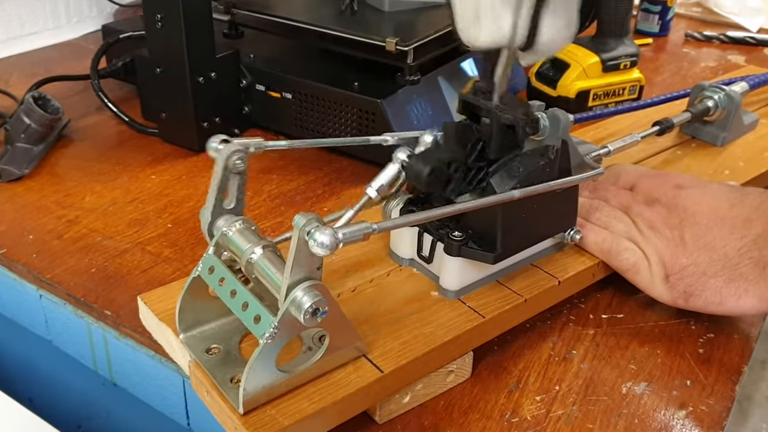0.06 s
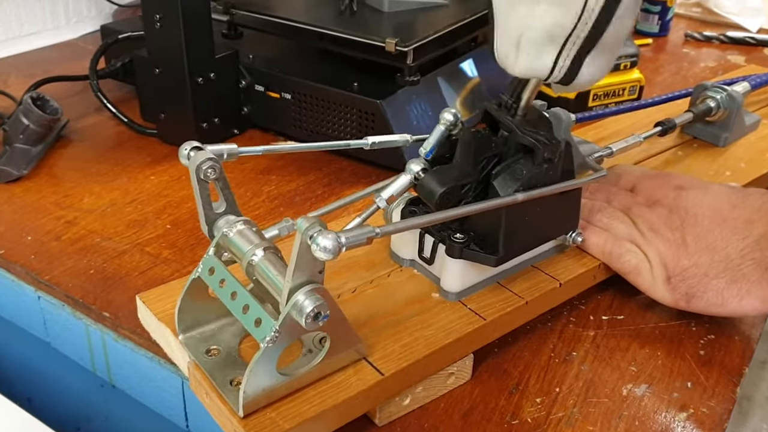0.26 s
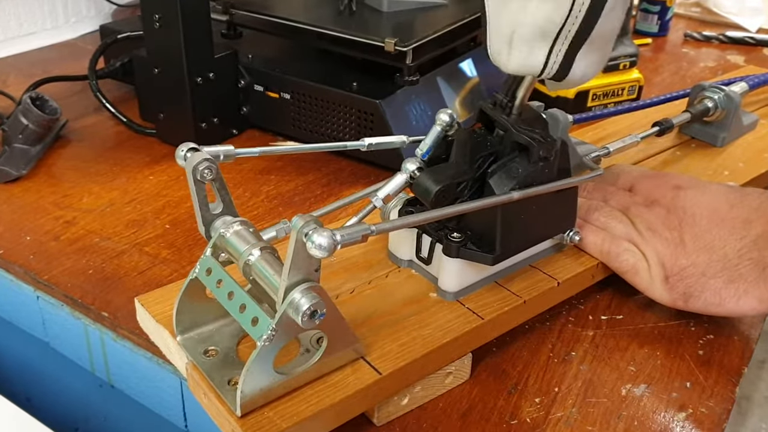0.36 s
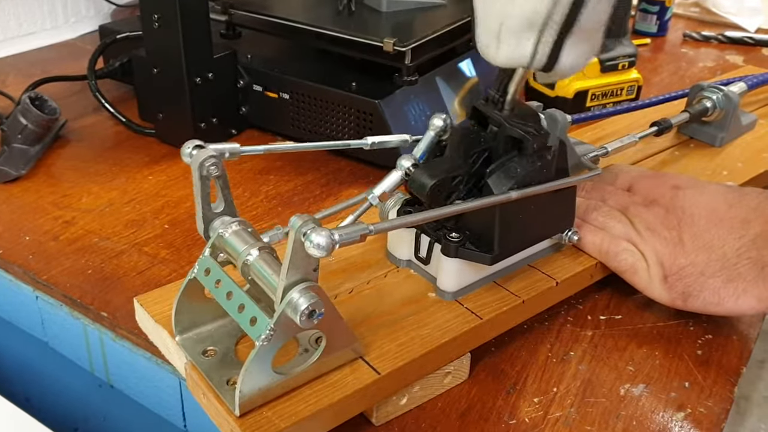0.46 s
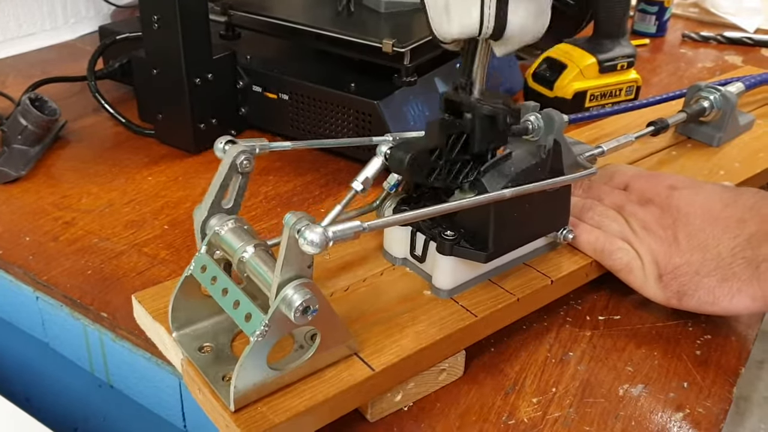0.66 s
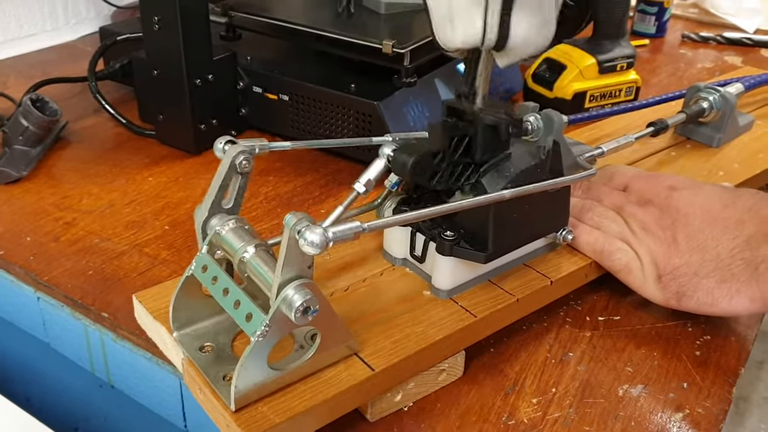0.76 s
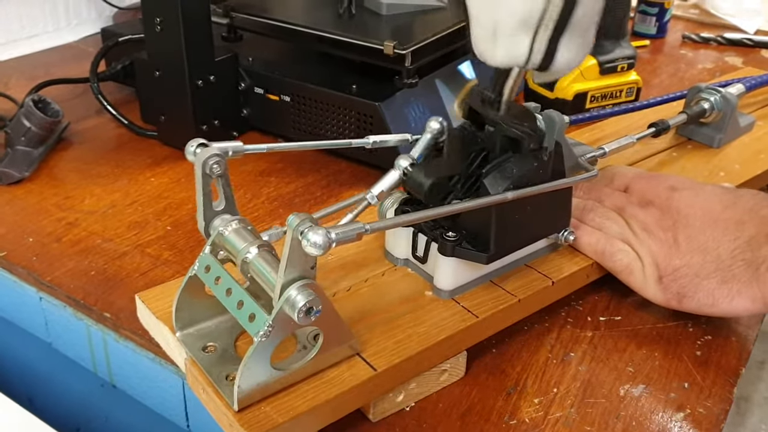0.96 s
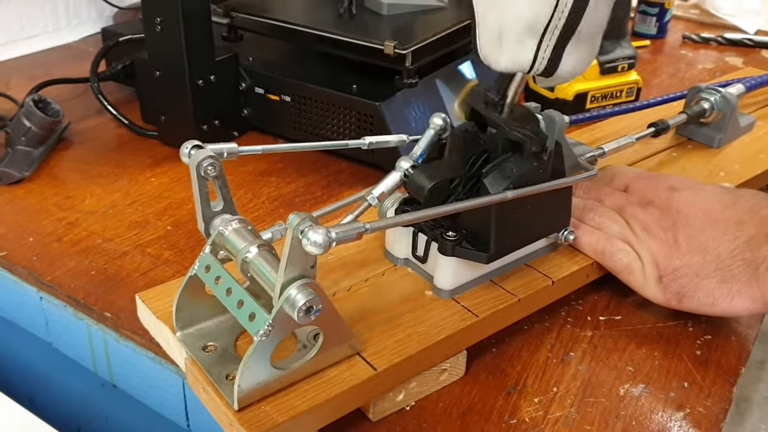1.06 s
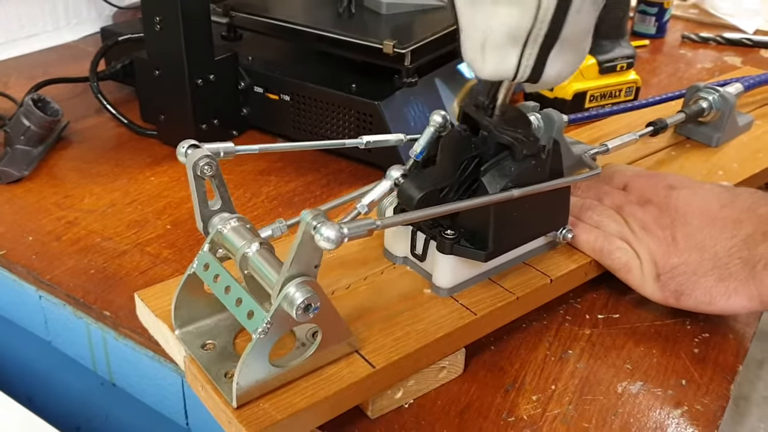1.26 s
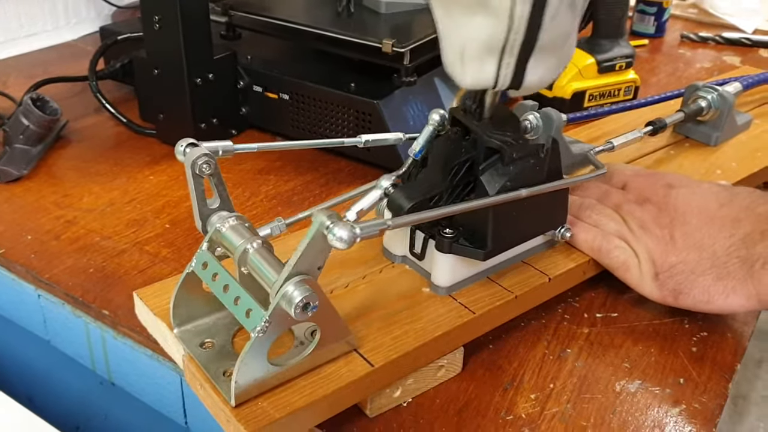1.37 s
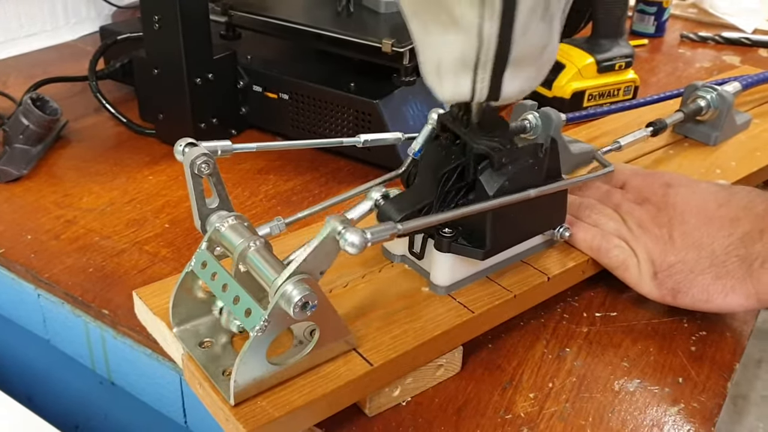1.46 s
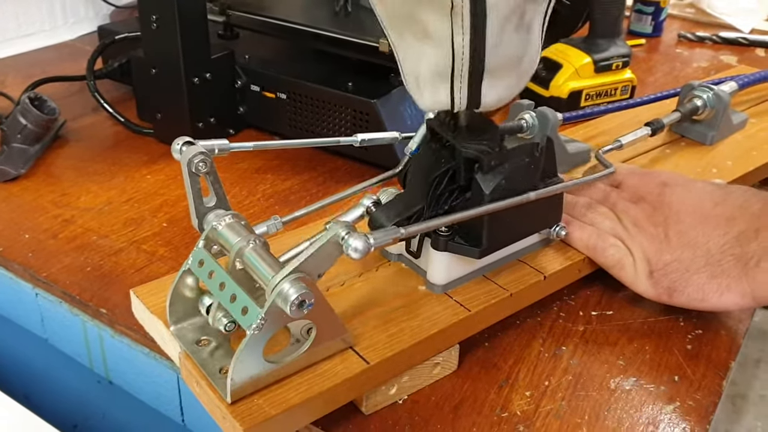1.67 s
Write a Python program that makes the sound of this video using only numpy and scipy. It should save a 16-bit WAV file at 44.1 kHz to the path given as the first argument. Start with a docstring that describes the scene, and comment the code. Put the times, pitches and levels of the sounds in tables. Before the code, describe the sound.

One sharp metal clack from a gear shifter, then light clicks and a brief squeak.

```python
"""A gear lever on a workbench

A gloved hand works a gear lever and its rods on a wooden bench in a small workshop. The lever snaps
into its gate with one hard clack that sets the metal ringing. Loose ball joints click, pivots rub and
groan, a rod whistles, and a dry joint lets go with a sharp squeak. The bench rumbles faintly below."""
import sys
import numpy as np
from scipy import signal
from scipy.fft import rfft, irfft
from scipy.io import wavfile
from scipy.ndimage import uniform_filter1d

SR = 44100
rng = np.random.default_rng(int(sys.argv[2]) if len(sys.argv) > 2 else 0)


def master(y):
    """Save y as 16-bit WAV."""
    cut = np.clip(np.atleast_2d(y).T, -1, 1)
    pcm = np.round(cut * 32767)  # scale
    wavfile.write(sys.argv[1], SR, pcm.astype(np.int16))


N = 74970  # 1.7 seconds


def amp(db):
    """Turns decibels into a number to multiply by."""
    return 10 ** (np.asarray(db) / 20)


def unit(x):
    """Scales a signal to an average (rms) size of 1."""
    return x / np.sqrt(np.mean(x ** 2) + 1e-20)


def unit_energy(x):
    """Scales a signal to an energy of 1 per channel."""
    return unit(x) / np.sqrt(x.shape[-1])


def read(points, hz):
    """Looks up a value between the rows of a frequency table."""
    freqs, values = np.transpose(points)
    return np.interp(np.log(hz + 1), np.log(freqs + 1), values)


def level(table, column):
    """Turns one dB column of a timed table into a volume curve."""
    columns = np.transpose(table)
    return amp(np.interp(np.arange(N) / SR, columns[0], columns[column]))


def pan(db):
    """Left and right gains; positive dB leans left."""
    return amp(np.array([[db], [-db]]) / 2)


def add(mix, start, sound):
    """Mixes a stereo sound in at a start time in seconds."""
    part = mix[:, max(round(start * SR), 0):][:, :sound.shape[-1]]
    part += sound[:, :part.shape[-1]]


def colour(x, points, size=4096):
    """Makes each frequency louder or softer, following rows of Hz and dB."""
    log_gain = np.log(amp(read(points, abs(np.fft.fftfreq(size, 1 / SR)))))
    response = np.exp(np.conj(signal.hilbert(log_gain)))  # nothing sounds ahead of a hit
    taps = np.fft.ifft(response).real[:size // 2]
    return signal.fftconvolve(x, taps[None], axes=1)[:, :x.shape[-1]]


def wander(size, smooth):
    """A random drift, averaged over `smooth` samples."""
    return unit(uniform_filter1d(rng.standard_normal(N), smooth))[:size]


def burst(t, rise, fade):
    """Rises quickly, then dies away. A fade time is how long a drop of 60 dB takes."""
    return np.minimum(t / rise, 1) * amp(-60 * t / fade)


# How alike left and right sound. Each row: frequency in Hz, likeness (1 means the same).
LIKENESS = [(100, 0.94), (300, 0.94), (900, 0.57), (2000, 0.14), (8000, 0.12)]

def noise(size):
    """Stereo white noise: the sides are alike in the bass and nearly unrelated in the treble."""
    mid, side = np.exp(2j * np.pi * rng.random((2, size // 2 + 1)))
    same = np.clip(read(LIKENESS, np.fft.rfftfreq(size, 1 / SR)), -1, 1)
    mid, side = mid * np.sqrt(1 + same), side * np.sqrt(1 - same)
    return unit(irfft(np.array([mid + side, mid - side]), size))


def tone(t, hz, db, rise, fade):
    """One dying tone; the higher it is, the more left and right are out of step."""
    apart = (1 - read(LIKENESS, hz)) * np.array([[1], [-1]]) * np.pi / 4
    return amp(db) * burst(t, rise, fade) * np.sin(2 * np.pi * hz * t + apart)


# The workshop's echo. Each row: frequency in Hz, fade time in seconds.
ROOM_FADE = [(150, 0.43), (500, 0.52), (1200, 0.29), (3500, 0.29), (8000, 0.24), (15000, 0.23)]

def in_room(x, echo_db):
    """Adds the short, dense echo of the workshop, 5 milliseconds late."""
    hz, t, spectrum = signal.stft(noise(SR // 2), SR, nperseg=256)
    fading = amp(-60 * t / read(ROOM_FADE, hz)[:, None])
    tail = signal.istft(spectrum * fading, SR, nperseg=256)[1]
    out = x.copy()
    add(out, 0.005, amp(echo_db) * signal.fftconvolve(x, unit_energy(tail), axes=1))
    return out


# The tone of the still air and of the rumble. Each row: frequency in Hz, boost in dB.
AIR_COLOUR = [(30, 3.5), (200, -9), (450, -19.5), (800, 14.5), (2000, 0.5), (7000, 8), (16000, -30.5)]
RUMBLE_COLOUR = [(15, -13.5), (35, -7.5), (68, 6.5), (95, -5.5), (130, -3.5), (220, -16), (400, -25),
                 (1500, -64.5)]
# The bench's shudder. Each row: time in seconds, sway level in dB, rumble level in dB.
BENCH_LEVELS = [(0, -71, -61.5), (.2, -85, -57.5), (.33, -89, -53.5), (.48, -70, -61.5), (.62, -87, -57.5),
                (.78, -62, -59), (1.0, -56.5, -55.5), (1.15, -56, -60), (1.35, -56, -64.5),
                (1.5, -75.5, -65), (1.7, -70.5, -58.5)]

def bench(sway_hz=45):
    """The bench sways and rumbles under the hand, over the quiet air of the room."""
    pitch = sway_hz * (1 + 0.044 * wander(N, smooth=4000))
    sway = unit(np.sin(2 * np.pi * np.cumsum(pitch) / SR)) * level(BENCH_LEVELS, 1)
    rumble = unit(colour(noise(N), RUMBLE_COLOUR)) * level(BENCH_LEVELS, 2)
    air = amp(-71.5) * unit(colour(noise(N), AIR_COLOUR))
    return sway + rumble + air


# The tone of the scrape and of the hiss. Each row: frequency in Hz, boost in dB.
SCRAPE_COLOUR = [(80, 1), (200, -3.5), (430, -16), (800, -2), (1400, 0), (2400, -3.5), (4000, -16),
                 (9000, -34)]
HISS_COLOUR = [(1000, -24), (1500, -8), (2100, -11), (3000, -4), (4500, -5.5), (5500, -3), (7000, -5),
               (8700, -11.5), (12000, -10), (16000, -25)]
# The sliding parts. Each row: time in seconds, scrape level in dB, hiss level in dB.
RUB_LEVELS = [(0, -62.5, -61.5), (.09, -52.5, -61.5), (.15, -67.5, -69.5), (.39, -67.5, -66),
              (.47, -63.5, -66), (.53, -60, -61), (.57, -51, -61), (.62, -59.5, -70), (.68, -70, -68.5),
              (.76, -69, -71.5), (.82, -57, -60), (.885, -55, -60), (.94, -68, -68.5), (1.01, -59.5, -65),
              (1.09, -72, -69), (1.36, -61, -60.5), (1.48, -69, -62.5), (1.65, -79.5, -75.5)]

def rubbing(catches_per_second=690, catch_share=0.22):
    """Rods and pivots slide with a scrape and a fine hiss, both dotted with tiny catches."""
    catches = unit(rng.standard_normal((2, N)) * (rng.random(N) < catches_per_second / SR))
    out = np.zeros((2, N))
    for column, shade in enumerate((SCRAPE_COLOUR, HISS_COLOUR), start=1):
        friction = np.sqrt(1 - catch_share) * noise(N) + np.sqrt(catch_share) * catches
        out += unit(colour(friction, shade)) * level(RUB_LEVELS, column)
    return out


def rod_whistle(start=0.816, length=0.075, hz=12300, width_hz=380):
    """A rod rubs in its eye and draws a faint, fuzzy whistle: a narrow band of noise."""
    t, out = np.arange(0, length, 1 / SR), np.zeros((2, N))
    band = np.exp(-0.5 * ((np.fft.rfftfreq(N, 1 / SR) - hz) / width_hz) ** 2)
    whistle = unit(irfft(rfft(noise(N)) * band, N))[:, :len(t)]
    add(out, start, amp(-59) * np.sin(np.pi * t / length) * whistle)
    return out


# The pivot's groans, and at 0.978 s the short ring of the knock that lands there. Each row: start in seconds, #
# length in seconds, first pitch in Hz, slide in Hz, waver as a share of the pitch, level in dB.
GROANS = [(0.343, 0.01, 727, -55, 0.067, -54), (0.698, 0.0236, 796, -30, 0.072, -54.5),
          (0.727, 0.047, 823, -53, 0.047, -48.5), (0.858, 0.043, 791, -18, 0.086, -53),
          (0.978, 0.01, 750, 6, 0.031, -39), (1.401, 0.012, 743, 2.5, 0.05, -56)]

def pivot_groans(edge_seconds=0.0029):
    """The pivot sings short, sliding notes that waver where it rubs roughly; the knock at 0.978 s rings one
    such note."""
    out = np.zeros((2, N))
    for start, length, hz, slide_hz, waver, db in GROANS:
        t = np.arange(0, length, 1 / SR)
        pitch = (hz + slide_hz * t / length) * (1 + waver * wander(len(t), smooth=150))
        note = np.sin(2 * np.pi * np.cumsum(pitch) / SR)
        swell = np.minimum(np.minimum(t, length - t) / edge_seconds, 1)
        flutter_db = wander(len(t), smooth=300)
        add(out, start, amp(db + flutter_db) * pan(3) * swell * note)
    return in_room(out, echo_db=-11.5)


# The ringing assembly. Each row: pitch in Hz, relative level in dB, fade time in seconds.
ASSEMBLY_TONES = [(128.8, -43, 0.33), (239.5, -41, 0.26), (707, -41.5, 0.032), (1112, -15.5, 0.028),
                  (1333, -31.5, 0.024), (1823, -26.5, 0.072), (2697, -23, 0.045), (3780, -25, 0.046),
                  (4350, -32, 0.056), (4950, -32, .06), (5360, -30, 0.061), (7050, -32, 0.1),
                  (7606, -29, 0.055)]
BLOW_RISE_SECONDS = 0.00079

def assembly_ring(t):
    """After a blow, the housing, bracket and board ring at their own pitches."""
    return sum(tone(t, hz, db, BLOW_RISE_SECONDS, fade) for hz, db, fade in ASSEMBLY_TONES)


# The tone that all clicks share. Each row: frequency in Hz, boost in dB.
CLICK_COLOUR = [(50, -32), (130, 3), (240, 7.5), (420, -4.5), (750, 6.5), (1800, 3.5), (2400, 1), (3300, 2),
                (4500, 2), (5700, -2.5), (7500, 0), (9000, -6.5), (12000, -4.5), (16000, -12.5)]
# The middles of five bands, from bass to treble, in Hz.
CLICK_BANDS = [200, 950, 2600, 6000, 12000]
# The clicks. Each row: start in seconds, fade time in seconds, a boost in dB for each of the five
# bands, lean to the left in dB, the joint's own pitch in Hz, that note's level in dB.
CLICKS = [ (0.0669, 0.031, -19, -30, -28.5, -31.5, -26.5, -3, 1103, -38.5),
          (0.0776, 0.0097, -48, -40, -33, -48, -46, -11, 5570, -58),
          (0.1941, 0.022, -44, -15, -33, -26, -34, -5.5, 846, -32.5),
          (0.1972, 0.032, -26, -18.5, -15, -27, -29, -1.5, 5540, -40.5),
          (.2140, 0.052, -15, -17, -56, -37, -30, -5, 2890, -50),
          (0.2259, 0.07, -24, -20, -27, -38, -48, 1, 1080, -48),
          (0.4315, 0.04, -35, -32.5, -33.5, -24, -34.5, -4.5, 6740, -69),
          (.4990, 0.03, -25.5, -25.5, -27, -34, -45, -2.5, 5560, -44.5),
          (.5545, 0.018, -26.5, -35.5, -26, -23.5, -23.5, -3, 7660, -55),
          (0.575, 0.012, -18.5, -29, -30, -23.5, -19.5, -1, 7600, -63),
          (.6620, 0.017, -26.5, -53, -33, -38, -54, -3, 3597, -48.5),
          (0.781, 0.042, -35, -20, -36, -13.5, -20.5, -8.5, 5950, -39),
          (0.7842, 0.057, -22, -20, -16.5, -20.5, -16.5, 0, 1360, -41.5),
          (.8310, 0.033, -23, -50, -23.5, -35, -28, -4.5, 5920, -45),
          (.9785, 0.091, -25.5, -19, -35.5, -32.5, -47.5, -2, 1126, -48),
          (1.139, 0.057, -48, -44, -45, -27.5, -45, -5, 4070, -54),
          (1.6920, 0.044, -35, -39.5, -46, -30, -45, -4, 4280, -58.5)]

def joint_clicks(rise_seconds=0.00068):
    """Each loose joint takes up its slack: it chatters, shakes the assembly and rings its own note."""
    t, out = np.arange(SR // 4) / SR, np.zeros((2, N))
    for start, fade, *band_db, pan_db, hz, db in CLICKS:
        chatter = colour(unit_energy(noise(len(t)) * burst(t, rise_seconds, fade)), CLICK_COLOUR)
        knock = amp(7.5) * chatter + amp(-12.5) * assembly_ring(t)
        click = colour(knock, list(zip(CLICK_BANDS, band_db)))
        note = tone(t, hz, db, rise_seconds, fade=0.029)
        add(out, start, pan(pan_db) * (click + note))
    return in_room(out, echo_db=-4.5)


# The dry joint's tones, almost evenly spaced, some in pairs. Each row: pitch in Hz,
# relative level in dB, fade time in seconds, lean to the left in dB.
SQUEAK_TONES = [(922, -41, 0.089, 3), (1007, -39.5, 0.053, -4), (1924, -33.5, 0.045, 1),
                (2890, -48, 0.067, -11), (3820, -42.5, 0.07, -8), (4824, -29.5, 0.046, 1),
                (5580, -27.5, 0.03, -5), (6200, -33, 0.026, 8), (6500, -24.5, 0.028, 4),
                (7425, -28, 0.032, -4), (7650, -30, 0.041, -6)]
# The tone of its rasp. Each row: frequency in Hz, boost in dB.
RASP_COLOUR = [(550, -24.5), (1000, -5.5), (1900, -12.5), (2900, -15), (3800, -3.5), (4800, 2.5), (7600, 1),
               (8800, -6.5), (11000, -4), (13200, 0.5), (15000, -6), (16000, -17)]

def joint_squeak(start=1.179, slips_per_second=950, slip_fade=0.018, rise_seconds=0.0012):
    """A dry joint sticks and slips in a quick, dying run, which makes it rasp and ring."""
    t, out = np.arange(SR // 4) / SR, np.zeros((2, N))
    for hz, db, fade, pan_db in SQUEAK_TONES:
        rise = np.interp(hz, [1000, 5000], [0.0075, rise_seconds])  # low tones build more slowly
        add(out, start + rng.random() / hz, pan(pan_db) * tone(t, hz, db + 1, rise, fade))
    slips = np.diff(np.floor(t * slips_per_second), prepend=-1) * amp(-60 * t / slip_fade)
    shape = burst(t, rise_seconds, fade=0.032)
    grit = noise(len(t)) * shape
    pitched_grit = signal.fftconvolve(grit, slips[None], axes=1)[:, :len(t)]  # repeats at each slip
    loose_grit = noise(len(t)) * shape
    rasp = unit_energy(pitched_grit) + amp(-4) * unit_energy(loose_grit)
    add(out, start, amp(-1.5) * colour(rasp, RASP_COLOUR))
    return in_room(out, echo_db=-6.5)


def bracket_note(t, hz=949, sink_hz=173, settle_seconds=0.0064, waver_hz=28):
    """The struck bracket's note starts high, sinks as the blow settles and wavers as it dies."""
    pitch = hz + sink_hz * np.exp(-t / settle_seconds) + waver_hz * wander(len(t), smooth=300)
    flutter_db = 3 * wander(len(t), smooth=400)
    note = amp(-30 + flutter_db) * np.sin(2 * np.pi * np.cumsum(pitch) / SR)
    return pan(-2) * burst(t, BLOW_RISE_SECONDS, fade=0.23) * note


# The tone of the lever's crack and of the first metal contact. Each row: frequency in Hz, boost in dB.
CRACK_COLOUR = [(60, -38.5), (140, -7), (240, -1), (430, -9.5), (650, -18), (1130, 2.5), (1600, -10),
                (1900, 2.5), (2300, -2), (2900, 6), (4500, -0.5), (6100, 2), (8700, -1.5), (12500, -7.5),
                (16000, -12)]
SNAP_COLOUR = [(500, -11), (3000, -6), (6000, 2.5), (8300, 2), (12500, 2), (16000, -20)]

def lever_clack(start=0.2442):
    """The lever hits its stop: a bright snap, a hard crack, a brief rattle and ringing metal."""
    t, out = np.arange(SR // 2) / SR, np.zeros((2, N))
    blow = burst(t, BLOW_RISE_SECONDS, fade=0.0095)
    rattle = amp(-19) * burst(t, BLOW_RISE_SECONDS, fade=0.075)
    crack = colour(unit_energy(noise(len(t)) * (blow + rattle)), CRACK_COLOUR)
    add(out, start, amp(9.5) * crack + amp(-4) * assembly_ring(t))
    snap = unit_energy(noise(len(t)) * burst(t, BLOW_RISE_SECONDS, fade=0.0034))
    add(out, start, amp(1.5) * pan(-3.5) * colour(snap, SNAP_COLOUR))
    out = in_room(out, echo_db=-9)
    add(out, start, bracket_note(t))
    return out


def scene():
    """The lever and its joints, over the rubbing and the bench."""
    linkage = lever_clack() + joint_clicks() + joint_squeak() + pivot_groans() + rod_whistle()
    return linkage + rubbing() + bench()


# The two microphones. Each row: frequency in Hz, how much louder the left one is in dB.
MIC_BALANCE = [(60, 3), (250, 4), (1200, 4), (2400, 3.5), (4400, 1), (9000, 1), (13000, -1)]

def record(dry, top_hz=16000):
    """Each microphone colours its own side, and the highest treble is cut off."""
    left = colour(dry[:1], [(hz, db / 2) for hz, db in MIC_BALANCE])
    right = colour(dry[1:], [(hz, -db / 2) for hz, db in MIC_BALANCE])
    treble_cut = signal.firwin(255, top_hz, window=("kaiser", 8), fs=SR)
    return signal.oaconvolve(np.vstack([left, right]), treble_cut[None], "same")


dry = scene()
out = record(dry)
master(out)
```